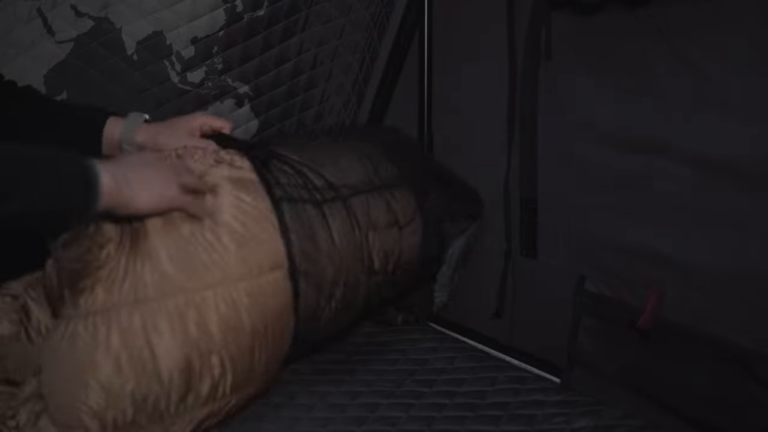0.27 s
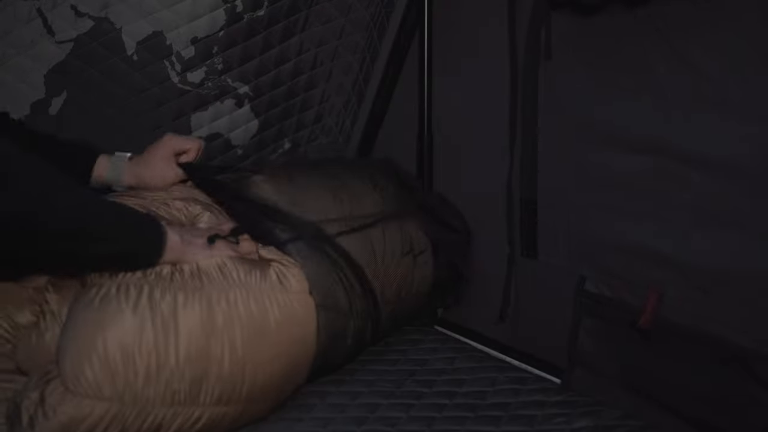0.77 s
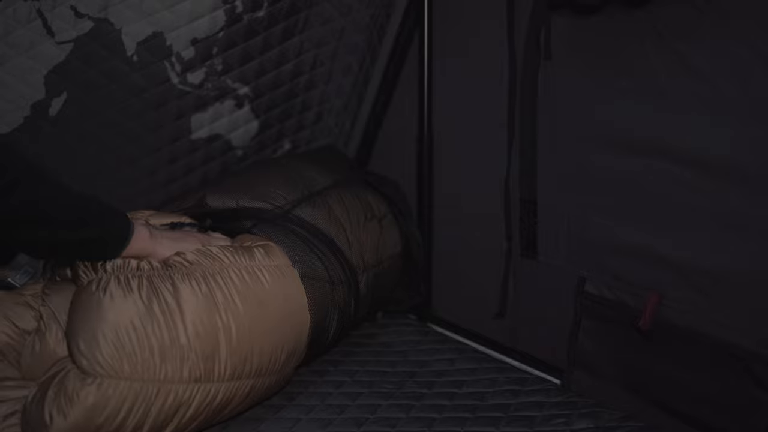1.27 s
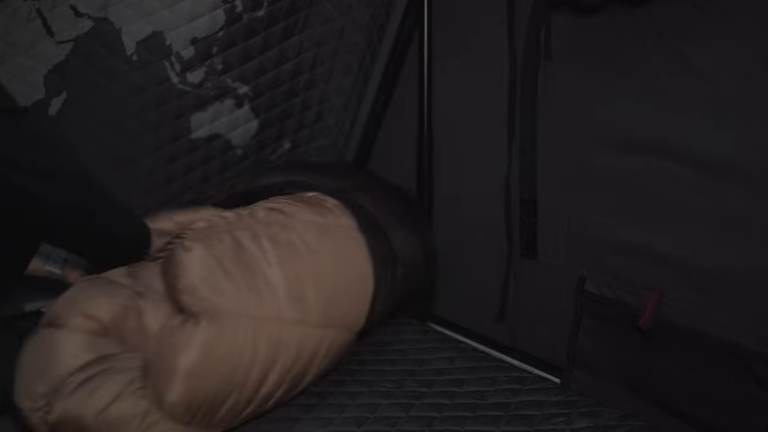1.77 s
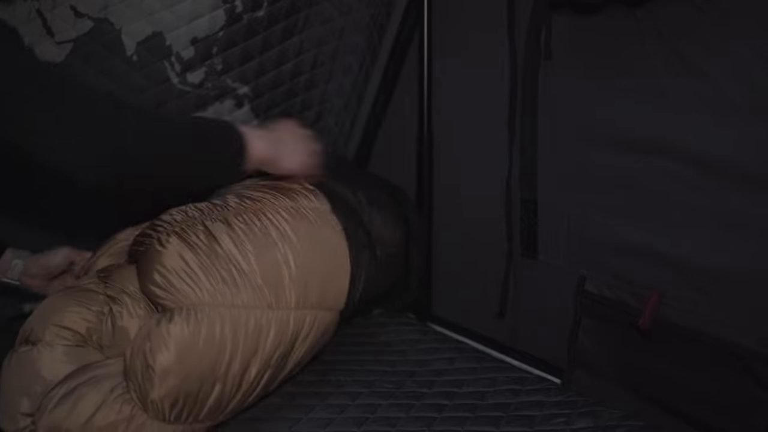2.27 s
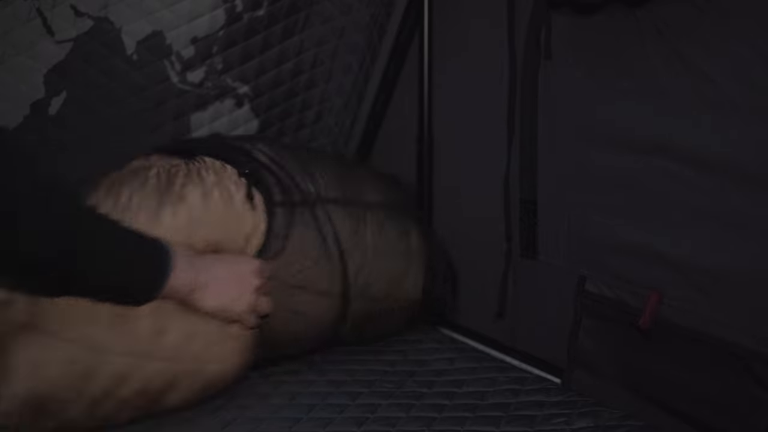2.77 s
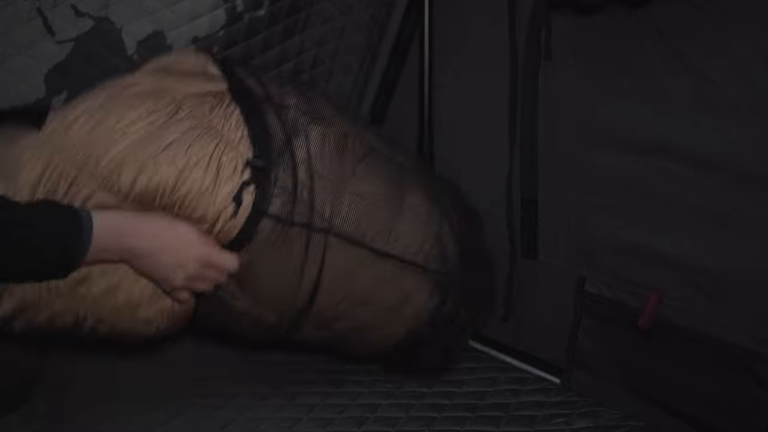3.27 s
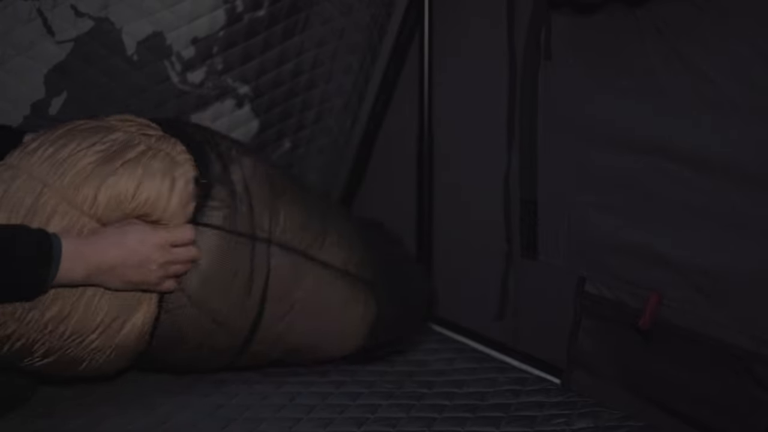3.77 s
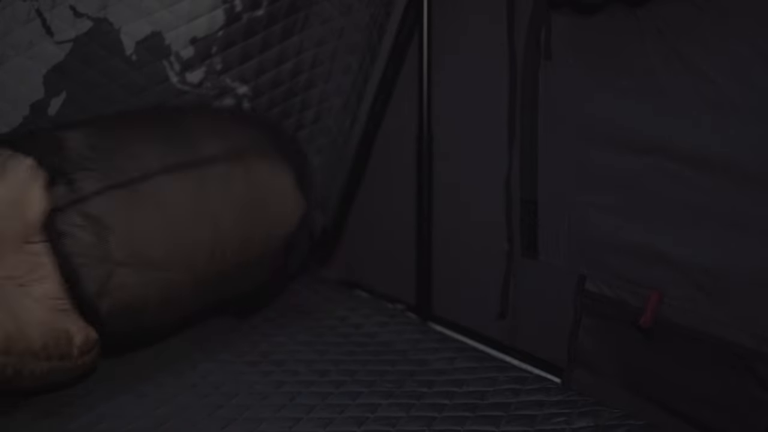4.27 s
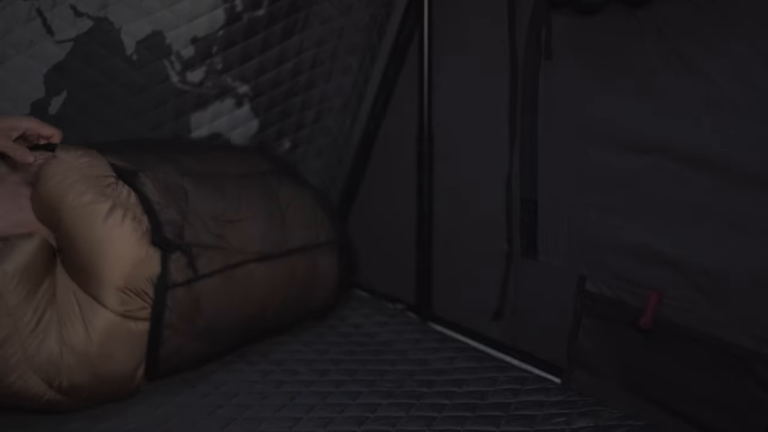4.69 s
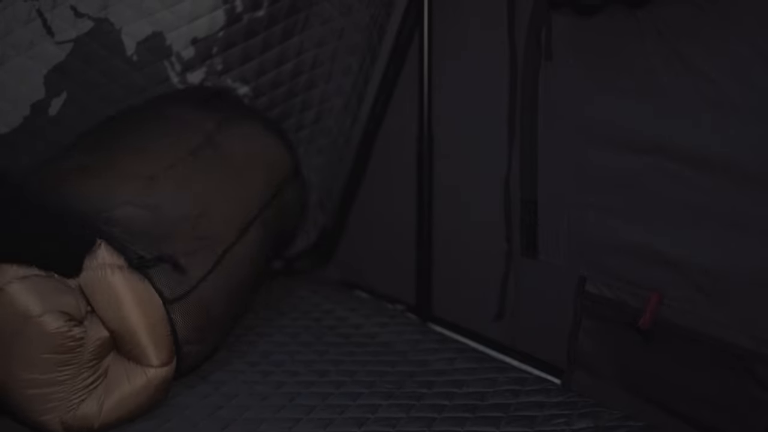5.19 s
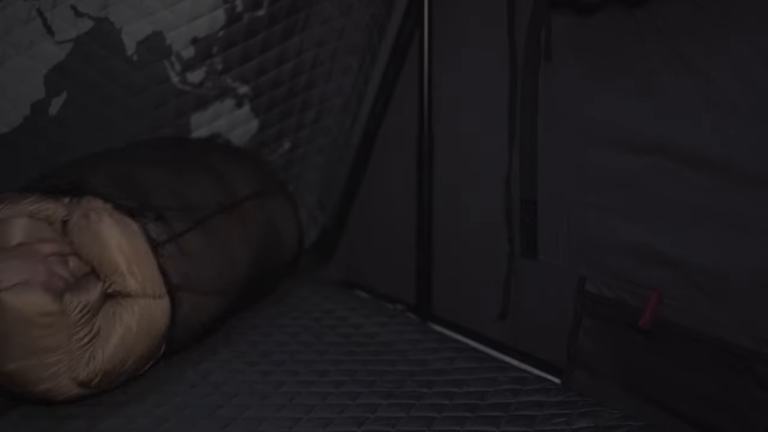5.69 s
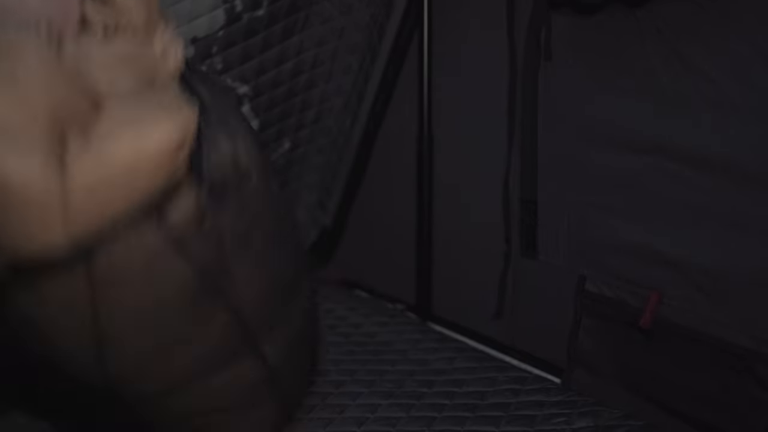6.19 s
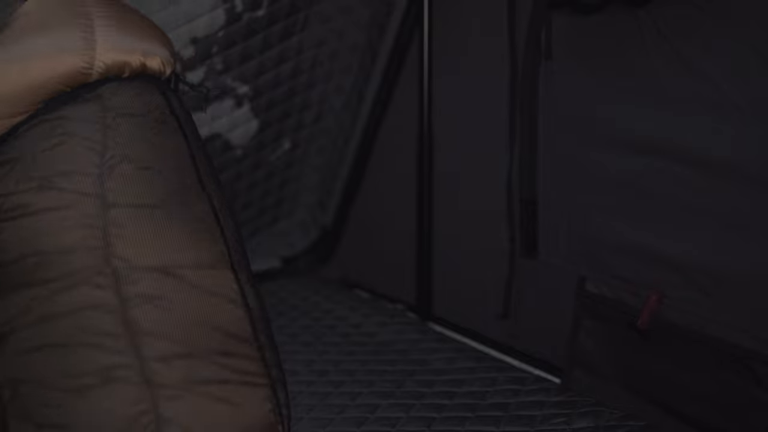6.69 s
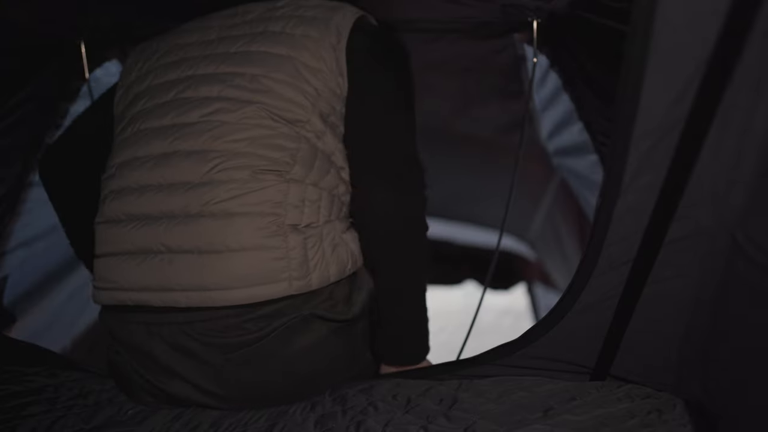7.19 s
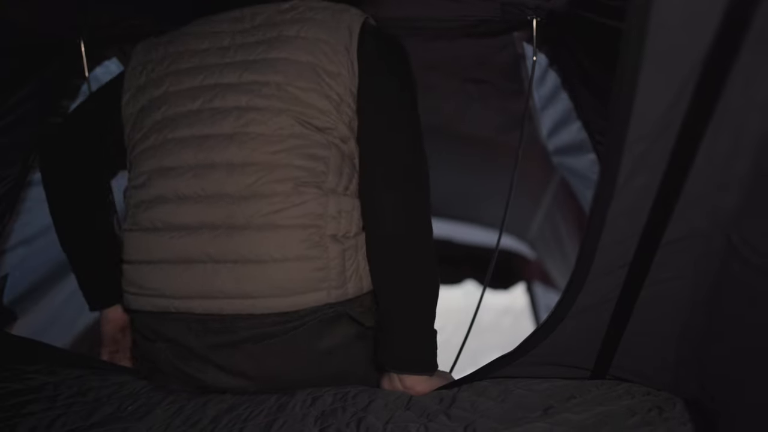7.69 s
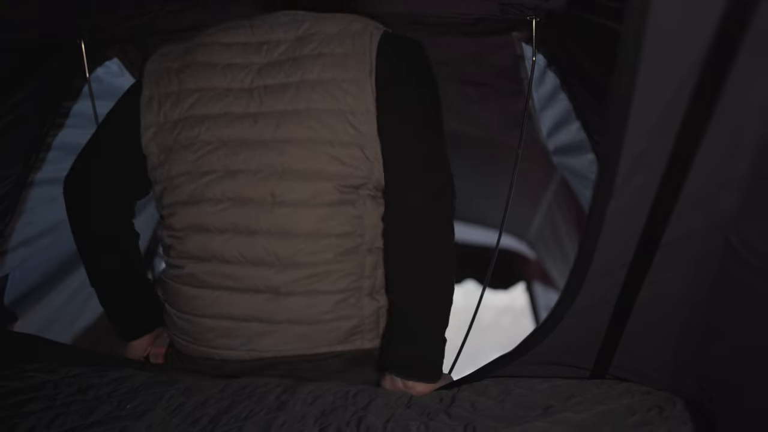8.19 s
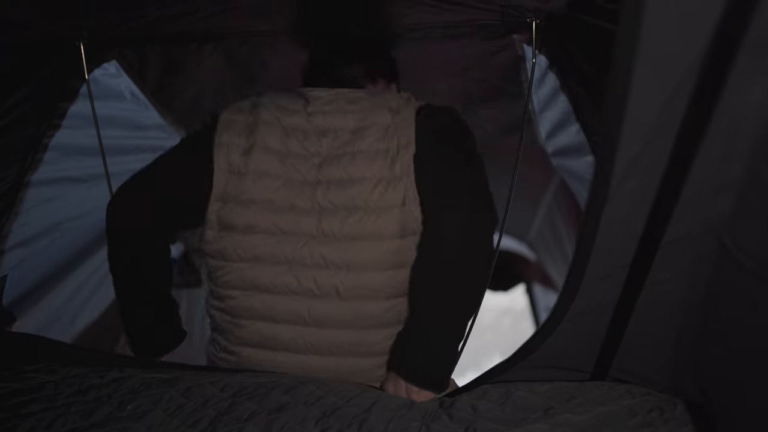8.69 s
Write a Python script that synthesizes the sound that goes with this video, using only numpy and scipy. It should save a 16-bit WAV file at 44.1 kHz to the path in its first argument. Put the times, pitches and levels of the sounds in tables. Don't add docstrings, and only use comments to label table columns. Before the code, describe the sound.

Bright, slippery cloth strokes come and go close to one microphone, over low draught rumble. Sharp snaps, soft thumps and a quick rattle over mat ribs punctuate the stuffing; a short whistling slide precedes the heaviest thump and pops. The sound then abruptly drops to distant, duller rustling and a few light knocks as someone moves out of the tent. Very little echo, almost identical in both channels.

```python
import sys
import numpy as np
from scipy import signal
from scipy.fft import rfft, irfft
from scipy.io import wavfile
from scipy.ndimage import uniform_filter1d

SR = 44100
rng = np.random.default_rng(int(sys.argv[2]) if len(sys.argv) > 2 else 0)


def file_out(sig):
    cols = np.atleast_2d(sig).T
    lim = np.clip(cols, -1, 1)
    pcm = np.round(lim * 32767).astype(np.int16)
    wavfile.write(sys.argv[1], SR, pcm)


def nominal_scale(level):
    x = np.asarray(level, float) / 20
    return 10 ** x


N = 394254
TIME = np.arange(N) / SR
CUT_S, LIFT_S = 7.165, 5.8

# t/s, level/dB
AIR_LEVEL = [(0.0, -25.5), (0.26, -33.5), (0.71, -48), (2.22, -46), (2.85, -56), (3.41, -43), (3.7, -45),
             (6.69, -55.5), (6.86, -33), (7.07, -40), (7.22, -41), (7.62, -39), (7.87, -47), (8.06, -37),
             (8.33, -46), (8.59, -37.5), (8.94, -40)]
# f/Hz, level/dB per Hz
DRAUGHT_TONE = [(5, -39), (12, 25), (25, 1), (45, 9), (90, -60)]
# f/Hz, level/dB per Hz
DRAG_TONE = [(200, -65), (450, 2.5), (650, 3), (1100, 2), (1700, -4), (2600, -6.5), (5000, -29)]
# f/Hz, level/dB per Hz
HEAVE_TONE = [(30, -31), (60, -2), (110, -1.5), (220, -4), (400, -8), (700, -35)]
# f/Hz, width/Hz, level/dB
RIB_CELLS = [(846, 117, 9), (1680, 130, 5.5), (2620, 170, 1), (3500, 550, -8)]
# f/Hz, level/dB per Hz
NEAR_TONE = [(530, -39), (900, -8.5), (1680, -3.5), (2890, -1), (3260, -1.5), (4460, -2.5), (8300, -2),
             (10300, -9.5), (12900, -10), (15200, -12.5), (16000, -46)]
# f/Hz, level/dB per Hz
FAR_TONE = [(260, -4), (450, -9), (1140, -7.5), (2790, -13.5), (4050, -11), (6530, -14.5), (9000, -13.5),
            (10600, -25), (14300, -21), (16000, -43)]

# peak t/s, swish level/dB, rise/s, fall/s, weight on the mat level/dB.
# Rise and fall each span 20 dB. First the bag is pushed into the sack lying on the ribs:
STUFFING_STROKES = [(0.112, -34.5, 0.68, 0.2, -51), (0.273, -32, 0.093, 0.035, -45),
                    (0.371, -32, 0.066, 0.13, -42), (0.672, -18.5, 0.24, 0.11, -40.5),
                    (0.813, -35, 0.086, 0.13, -39.5), (0.95, -35.5, 0.17, 0.15, -49),
                    (1.085, -28, 0.15, 0.12, -40.5), (1.18, -35.5, 0.16, 0.12, -40.5),
                    (1.45, -46, 0.66, 0.1, -68), (1.613, -34.5, 0.2, 0.089, -48),
                    (1.986, -31.5, 0.57, 0.079, -41), (2.178, -39.5, 0.025, 0.03, -53),
                    (2.247, -42, 0.74, 0.07, -52), (2.306, -40.5, 0.012, 0.03, -57),
                    (2.335, -44, 0.053, 0.048, -49), (2.407, -40, 0.014, 0.04, -56),
                    (2.436, -39.5, 0.05, 0.072, -49), (2.561, -38, 0.064, 0.13, -45.5),
                    (2.759, -29, 0.18, 0.27, -40), (2.96, -39.5, 0.24, 0.31, -53.5),
                    (3.184, -41, 0.13, 0.5, -48), (3.635, -35, 0.16, 0.036, -44),
                    (3.749, -35, 0.059, 0.071, -32), (3.883, -25.5, 0.053, 0.047, -36.5),
                    (4.041, -22, 0.31, 0.16, -41), (4.146, -26, 0.17, 0.053, -37.5),
                    (4.301, -31, 0.21, 0.044, -43), (4.544, -29.5, 0.3, 0.15, -43.5),
                    (4.72, -36.5, 0.15, 0.35, -43), (4.991, -19, 0.24, 0.19, -44.5),
                    (5.229, -27, 0.53, 0.095, -38.5)]
UPENDING_STROKES = [(5.414, -35.5, 0.14, 0.15, -46), (5.47, -43, 0.06, 0.06, -64),
                    (5.552, -35.5, 0.12, 0.19, -58), (5.704, -39.5, 0.034, 0.48, -46),
                    (5.932, -37.5, 0.44, 0.19, -45.5), (6.263, -34.5, 0.53, 0.17, -54),
                    (6.374, -34, 0.04, 0.115, -42), (6.478, -32.0, 0.067, 0.14, -50),
                    (6.729, -32, 0.43, 0.17, -39.5), (6.835, -25.5, 0.077, 0.0096, -39),
                    (6.891, -25.5, 0.027, 0.077, -38), (6.97, -31, 0.042, 0.16, -42),
                    (7.07, -29.5, 0.28, 0.1, -37.5)]
LEAVING_STROKES = [
    (7.218, -46.5, 0.11, 0.34, -47.5),
    (7.445, -45, 0.22, 1, -47.5),
    (7.876, -42.5, 0.3, 0.83, -49),
    (8.15, -51, 0.48, 1.5, -52),
    (8.324, -46, 0.012, 0.034, -48),
    (8.464, -44, 0.34, 0.13, -50.5),
    (8.645, -52, 0.551, 0.2, -56),
    (8.75, -66, 0.11, 0.1, -48.5),
    (8.88, -49, 0.096, 0.225, -69),
]

# peak t/s, level/dB, f/Hz
DEAD_THUDS = [(0.771, -37, 139), (1.947, -22, 302), (2.095, -31.5, 108), (2.18, -29, 103),
              (2.306, -31.5, 110), (2.741, -17.5, 119), (3.744, -19, 107), (3.759, -23, 126),
              (3.866, -21.5, 122), (3.913, -21.5, 163), (5.816, -24.5, 155), (5.87, -28.5, 150),
              (5.937, -37, 145), (6.42, -33, 154), (6.488, -32, 139), (6.537, -27.5, 133),
              (6.682, -31, 71.9), (6.727, -26, 172), (6.839, -10, 262), (6.855, -3, 98.3),
              (7.018, -14.5, 164), (7.994, -39, 226), (8.083, -30.5, 194), (8.188, -33, 219),
              (8.491, -30.5, 90.5), (8.53, -35, 81), (8.749, -37, 90)]
# peak t/s, level/dB, f/Hz
RINGING_SLUMPS = [(0.188, -22.5, 151), (0.836, -25, 270), (1.096, -37, 187), (3.223, -31, 200),
                  (3.261, -30, 220), (3.295, -30.5, 130), (3.777, -16.5, 123), (3.84, -22, 149),
                  (4.296, -26, 122.5), (4.441, -31.5, 130), (6.091, -36.5, 130), (6.255, -37, 121),
                  (5.405, -31.5, 125), (6.372, -37, 172), (6.885, -21.5, 128), (7.042, -17, 149),
                  (7.17, -31.5, 180), (7.619, -24, 213), (8.328, -32.5, 212), (8.473, -26, 246)]
# t/s, level/dB, f/Hz
HARD_KNOCKS = [(0.187, -29, 400), (0.794, -31, 950), (1.949, -22, 504), (1.957, -27, 350),
               (2.781, -29, 855), (3.258, -28.5, 760), (3.283, -33, 795), (3.91, -18.5, 760),
               (6.364, -39, 600), (6.54, -34, 695), (6.724, -19.5, 1140), (6.834, -18, 645),
               (7.021, -21, 610), (7.0315, -18, 865), (7.038, -22, 800), (7.276, -34.5, 850),
               (7.993, -38, 850), (8.183, -36.5, 829)]
# t/s, level/dB, f/Hz
PADDED_KNOCKS = [(2.432, -40.5, 1020), (2.736, -29, 990), (5.223, -31, 955), (5.813, -32, 1130),
                 (6.492, -34, 810), (6.841, -16.5, 760), (6.844, -17, 1030), (7.017, -26, 745),
                 (7.045, -20, 710), (7.049, -14.5, 996), (7.619, -31, 940), (8.47, -36, 610)]
# t/s, knock level/dB, cloth scratch level/dB
RIB_YANK = [(3.695, -40, -42), (3.706, -37, -24.5), (3.721, -33, -43.5), (3.73, -27, -27),
            (3.742, -28, -20), (3.749, -40, -29), (3.758, -31, -32), (3.771, -28, -24), (3.782, -26, -26),
            (3.794, -31, -35), (3.807, -38, -45), (3.857, -30, -39)]
# t/s, level/dB, f/Hz
CLOTH_SNAPS = [(1.597, -40, 4554), (1.9465, -21, 2400), (2.178, -44, 3500), (3.257, -30, 3250),
               (3.281, -29, 3040), (7.993, -43, 1500), (8.183, -48, 1500), (5.872, -27, 2500),
               (6.72, -29, 1960), (6.837, -17.5, 3080), (7.62, -33, 1900), (8.3255, -31.5, 4200)]
# t/s, level/dB, f/Hz
CLOTH_SCUFFS = [
    (2.305, -46, 2670),
    (2.354, -41, 1470),
    (2.428, -38, 2900),
]
PULL_TIMES = [8.352, 8.376]
PULL_LEVELS = [-45, -49]
# f/Hz, level/dB, time to fall 60 dB/s
PULL_TONES = [(12210, -5, .06), (13300, 0, .035), (14640, 1, .13)]

# start t/s, level/dB, f/Hz, turns until it has died to a third
SUDDEN_POPS = [(0.183, -21.5, 300, 1.1), (0.1923, -24.5, 338, 1), (1.9438, -14, 230, 0.93),
               (1.944, -2.5, 794, 1.1), (1.9455, -14, 1500, 1.2), (1.948, -18, 415, 1),
               (1.9522, -22, 487, 1.1), (2.209, -28, 171, 0.75), (2.404, -37, 1750, 4),
               (2.427, -34, 900, 3.6), (2.72, -26, 200, 1.7), (2.732, -28, 1530, 8.6), (3.717, -26, 110, 2.2),
               (3.7402, -11, 2600, .9), (3.7445, -26, 1810, 13), (3.752, -22, 704, 1.7),
               (3.769, -26, 94.5, 1.8), (3.794, -32, 382, 2.6), (3.802, -28, 100, 3.4), (3.816, -32, 870, 4),
               (3.875, -20, 2400, 1.5), (3.878, -34, 1000, 4), (4.4, -43, 310, 8), (5.803, -24, 149, 1.4),
               (6.108, -34, 950, 2), (6.235, -32, 730, 5.5), (6.3607, -20.5, 165, 0.67),
               (6.4875, -20, 600, .6), (6.496, -25, 700, .8), (6.535, -23, 450, .6), (6.8375, -2, 560, 0.75),
               (6.8399, -3.5, 754, 1), (6.8393, -10, 1510, 3.4), (6.844, -11, 189, 1.4),
               (6.8506, -5, 330, 0.69), (7.0432, -8, 600, 0.88), (7.61, -26, 800, 2.4), (7.626, -24, 168, 2),
               (7.644, -33, 420, 2.8), (7.992, -23, 560, 0.57), (8.1837, -19.5, 360, 0.71),
               (8.3242, -18, 2200, .6), (8.467, -29, 323, 4), (8.527, -25, 7000, 1.5),
               (0.773, -28.5, 180, 0.91), (0.869, -34, 150, 1.8), (1.087, -30, 870, 5),
                (1.955, -26, 1500, 3), (2.316, -40, 12500, 60), (2.402, -41, 8400, 90),
                (2.441, -30, 3600, 13), (2.7, -24.5, 1200, 2), (2.724, -25, 900, 4), (3.209, -33, 250, 1.2),
                (3.23, -31, 200, 1), (3.281, -26, 280, 1.3), (3.749, -27, 2800, 6), (2.354, -34, 250, 1.5),
                (3.7699, -20.5, 300, 1), (3.81, -29, 250, 2), (3.858, -21, 330, 1.7),
                (6.587, -33, 300, 1.5), (6.658, -30, 200, 1.3), (6.701, -27, 150, 1.6),
                (3.716, -30, 900, 3), (3.7575, -18.5, 160, 1), (3.758, -31, 1100, 2),
                (6.4154, -22, 300, 0.65), (6.422, -30, 150, 1), (6.691, -31, 450, 2.1),
                (6.7187, -11, 480, 0.66), (6.8318, -16, 330, 1.3), (7.013, -27, 400, 1.3),
                (7.0445, -6.5, 740, 1), (7.0487, -19, 1100, 3), (7.053, -10.5, 1010, 3),
                (7.0575, -18, 900, 1.7), (7.657, -31, 700, 2), (7.662, -35, 1500, 3), (7.72, -31, 200, 1.6),
                (7.773, -28, 310, 2), (8.13, -29, 400, 1), (8.25, -30, 900, 2), (7.793, -28, 500, 0.92),
                (7.978, -36, 700, 4), (8.3238, -25, 7500, 1.8), (8.3242, -34, 200, 0.85),
                (8.434, -31, 900, 3), (8.66, -35, 242, 2), (8.745, -31, 552, 2)]
# start t/s, end t/s, level/dB, first f/Hz, last f/Hz
SEAM_SCRAPES = [
    (6.374, 6.387, -32, 2850, 2450),
    (6.396, 6.419, -24, 1937, 795),
    (6.832, 6.842, -28, 6200, 2600),
]
# start t/s, end t/s, slips per s, level/dB, pitch factor
RIB_JUDDERS = [
    (4.153, 4.348, 72, -46, 0.98),
    (4.363, 4.631, 54, -43.5, 0.99),
    (6.149, 6.279, 98, -47.5, 0.82),
]
# (frequency ratio, level/dB)
FUZZY_BANDS = [
    (1100, [(0, 1870, -44), (.06, 3000, -44), (.11, 4100, -37), (.16, 4800, -44), (.22, 5400, -43)]),
    (1150, [(6.07, 4600, -55), (6.125, 6030, -42), (6.16, 7240, -39), (6.23, 8100, -32), (6.295, 8000, -36), (6.33, 6340, -43), (6.39, 3500, -47)], [(1.58, -2)]),
    (450, [(6.09, 4000, -48), (6.12, 4100, -43), (6.25, 3913, -45), (6.32, 4170, -53)]),
    (420, [(6.37, 3000, -48), (6.388, 2310, -49), (6.399, 1920, -30), (6.412, 990, -35), (6.422, 300, -32)]),
    (460, [(4.5, 2300, -57), (4.585, 2620, -35.5), (4.62, 2700, -42)]),
    (2500, [(2.31, 12600, -50), (2.318, 12600, -43), (2.34, 13300, -41), (2.352, 12500, -49)]),
    (6000, [(8.85, 12000, -62), (8.865, 12000, -55), (8.9, 12000, -53), (8.93, 12000, -60)]),
    (76, [(2.77, 250, -34), (2.825, 210, -36), (2.87, 170, -42)]),
]
# t/s, low f/Hz, high f/Hz
SIDE_SPLITS = [(0.811, 4600, 7700), (0.882, 8900, 10400), (1.786, 13700, 15300), (1.972, 8200, 9800),
               (1.974, 11600, 13200), (2.902, 10200, 12500), (4.039, 8800, 10400), (4.135, 4200, 5800),
               (4.135, 6800, 9700), (4.135, 13800, 15200), (4.875, 5600, 7000), (4.875, 11100, 13900),
               (5.201, 5600, 8300), (5.409, 8800, 10500), (5.502, 13000, 14600), (5.735, 10300, 11800),
               (5.737, 12300, 14600), (6.594, 4100, 5200), (7.59, 5000, 6400), (7.591, 11600, 13100),
               (7.822, 4200, 5300)]


def evened(x):
    return x / np.sqrt(np.mean(x ** 2) + 1e-20)


def read(points, hz):
    f, value = np.transpose(points)
    return np.interp(np.log(hz + 1), np.log(f + 1), value)


def column(table, t, index):
    rows = np.array(table)
    return np.interp(t, rows[:, 0], rows[:, index])


def add(mix, s, sound):
    part = mix[max(round(s * SR), 0):][:len(sound)]
    part += sound[:len(part)]


def coloured(x, points):
    gain = nominal_scale(read(points, np.fft.rfftfreq(len(x), 1 / SR)))
    return evened(irfft(rfft(x) * gain, len(x)))


def hiss(count):
    return rng.standard_normal(SR // 2)[:count]


def wander(hz):
    pole = np.exp(-2 * np.pi * hz / SR)
    return evened(signal.lfilter([1], np.convolve([1, -pole], [1, -pole]), rng.standard_normal(N)))


def uneven_noise(hz):
    return nominal_scale(2.0 * wander(hz)) * rng.standard_normal(N)


def resonate(x, hz, width):
    turn = np.exp(2j * np.pi * np.cumsum(hz * np.ones(len(x))) / SR)
    r = np.exp(-np.pi * width / SR)
    return 2 * (turn * signal.lfilter([1 - r], [1, -r], x / turn + 1e-18)).real


def slips(per_s, spread_db):
    chance, size, sign = rng.random((3, N))
    loudness = nominal_scale(-spread_db * np.log(size + 0.0064))
    return (chance < per_s / SR) * loudness * np.sign(sign - .5)


def humps(t, peak_s, peak_db, rise, fall, rest_db, depth=1):
    coarse = np.arange(0, N / SR + .002, .002)[:, None]
    apart = abs(coarse - peak_s) / np.where(coarse < peak_s, rise, fall)
    swell_db = peak_db - 20 * depth * apart ** 1.47
    power = nominal_scale(2 * swell_db).sum(1) + nominal_scale(2 * rest_db)
    return np.interp(t, coarse[:, 0], 10 * np.log10(power))


def strokes(t):
    rows = STUFFING_STROKES + UPENDING_STROKES + LEAVING_STROKES
    s, swish_db, rise, fall, weight_db = np.transpose(rows)
    swish_level = humps(t, s, swish_db, rise, fall, rest_db=-70)
    weight_level = humps(t, s, weight_db, rise, fall, rest_db=-60.5, depth=0.67)
    return swish_level, weight_level


def draught():
    return nominal_scale(column(AIR_LEVEL, TIME, index=1)) * coloured(rng.standard_normal(N), DRAUGHT_TONE)


def tent(x):
    t = TIME[:SR // 10]
    echoes = rng.standard_normal(len(t)) * (rng.random(len(t)) < .06)
    fade = nominal_scale(-60 * t / 0.031) * (t > .003)
    tail = signal.lfilter([1], [1, -.6], echoes) * fade
    return signal.oaconvolve(x, tail / np.linalg.norm(tail))[:N]


def floor_dip(x):
    return x - 0.45 * (TIME < LIFT_S) * resonate(x, hz=479, width=200)


def heaving(weight_db):
    s, db, _ = np.transpose(DEAD_THUDS + RINGING_SLUMPS)
    wake_s = 0.084
    wake_db = humps(TIME, s, -45 + 0.53 * (db + 24.5), wake_s, 1.8 * wake_s, rest_db=-66)
    lean_db = -46 + 0.65 * (weight_db + 46.5) + np.where(TIME < CUT_S, -1.5, 1.5)
    return np.hypot(nominal_scale(wake_db), nominal_scale(lean_db))


def mat():
    bumps = slips(per_s=220, spread_db=0.5)
    cells = evened(sum(nominal_scale(db) * resonate(bumps, hz, width) / width for hz, width, db in RIB_CELLS))
    crumple = coloured(slips(per_s=300, spread_db=1.5), DRAG_TONE)
    rubbing = coloured(uneven_noise(hz=40.0), DRAG_TONE)
    drag = np.where(TIME < LIFT_S, .5 * cells, 0.58 * crumple) + 1.17 * rubbing
    heave = coloured(uneven_noise(hz=10.0), HEAVE_TONE)
    weight_db = strokes(TIME)[1]
    return nominal_scale(weight_db) * drag + heaving(weight_db) * heave


def blow(s, db, hz, ms, rise, grit, partials, loose=0.071):
    length = ms / 1000
    t = np.arange(round(6 * length * SR)) / SR
    peak = rise * length
    shape = (t / peak * np.exp(1 - t / peak)) ** 1.43
    detune, turn = rng.standard_normal((2, len(partials), 1))
    ratio, part_db = np.transpose(partials)[:, :, None]
    part_hz = hz * ratio * (1 + loose * detune)
    ring = (nominal_scale(part_db) * np.cos(2 * np.pi * (part_hz * (t - peak) + 0.31 * turn))).sum(0)
    gritty = evened(resonate(hiss(len(t)), 1.08 * hz, 0.34 * hz))
    return s - peak, nominal_scale(db) * shape * (ring + grit * gritty)


def thumps(out):
    for rows, turns in (DEAD_THUDS, 2.1), (RINGING_SLUMPS, 3.6):
        for s, db, hz in rows:
            add(out, *blow(s, db, hz, turns / hz * 1e3, rise=0.29, grit=0.22,
                           partials=[(.62, -4), (.9, -1.5), (1.45, -7), (2.4, -15.5)]))


def knocks(out):
    for rows, ms in (HARD_KNOCKS, 5.4), (PADDED_KNOCKS, 7.5):
        for row in rows:
            add(out, *blow(*row, ms, rise=0.296, grit=0.17,
                           partials=[(.45, -11.5), (.7, -0.5), (1.1, 0.5), (1.6, -11.5), (2.2, -8)]))


def yank(out):
    for s, db, scratch_db in RIB_YANK:
        add(out, *blow(s, db, hz=900, ms=4.4, rise=0.43, grit=0.38,
                       partials=[(1.03, 7.5), (1.98, -5), (2.97, -4)], loose=0.032))
        add(out, *blow(s - .001, scratch_db, hz=4200, ms=2.2, rise=0.4, grit=0.81,
                       partials=[(.64, 0.5), (.9, -9), (1.3, -4)]))


def snaps_and_scuffs(out):
    for row in CLOTH_SNAPS:
        add(out, *blow(*row, ms=2.05, rise=0.25, grit=0.52,
                       partials=[(.65, 1.5), (.9, 0), (1.3, -7), (2.2, -16)]))
    for row in CLOTH_SCUFFS:
        add(out, *blow(*row, ms=7, rise=0.4, grit=1.5,
                       partials=[(.6, 3), (1.1, -3), (1.7, -5), (2.6, -9)]))


def zip_pull(out):
    t = TIME[:SR // 8]
    for s, strike_db in zip(PULL_TIMES, PULL_LEVELS):
        add(out, s, sum(nominal_scale(strike_db + db - 60 * t / t60) * np.sin(2 * np.pi * hz * t)
                        for hz, db, t60 in PULL_TONES))


def hits():
    out = np.zeros(N)
    for source in thumps, knocks, yank, snaps_and_scuffs, zip_pull:
        source(out)
    return signal.sosfiltfilt(signal.butter(3, 52, "high", fs=SR, output="sos"), out)


def judder(start, end, per_s, db, pitch):
    t = TIME[:round((end - start + .05) * SR)]
    uneven = evened(uniform_filter1d(hiss(len(t)), size=400))
    turns = np.cumsum(per_s * np.exp(.25 * uneven)) / SR
    scuff = np.exp(-(turns % 1) / 0.33) * hiss(len(t)) * nominal_scale(6.6 * uneven)
    swell = np.interp(t, [0, .03, end - start - .03, end - start], [0, 1, 1, 0])
    cells = sum(nominal_scale(cell_db) * resonate(scuff * swell, hz * pitch, width) / np.sqrt(width)
                for hz, width, cell_db in RIB_CELLS)
    return start, nominal_scale(db) * evened(resonate(cells, 800, 3000))


def seam_scrape(start, end, db, first_hz, last_hz):
    count = round((end - start) * SR)
    angle = 2 * np.pi * np.cumsum(np.linspace(first_hz, last_hz, count)) / SR
    return start, nominal_scale(db) * np.hanning(count) ** 0.33 * (np.sin(angle) + nominal_scale(-18) * np.sin(2 * angle))


def pop(s, db, hz, turns):
    cycles = hz * TIME[:round(8 * turns / hz * SR)]
    onset = 1 - np.exp(-cycles / 0.063)
    return s, -nominal_scale(db) * np.sin(2 * np.pi * cycles) * np.exp(-cycles / turns) * onset


def whistle(width, rows, overtones=()):
    t = np.arange(rows[0][0], rows[-1][0], 1 / SR)
    hz, db = column(rows, t, index=1), column(rows, t, index=2)
    flutter = evened(uniform_filter1d(hiss(len(t)), size=300))
    noise = hiss(len(t)) * nominal_scale(0.89 * flutter)
    bands = np.zeros(len(t))
    for ratio, over_db, blur in [(0.99, 0, 1)] + [(*band, 4) for band in overtones]:
        once = resonate(noise, ratio * hz, blur * width)
        bands += nominal_scale(over_db) * evened(resonate(once, ratio * hz, blur * width))
    return t[0], nominal_scale(db) * bands * signal.windows.tukey(len(t), .1)


def swish():
    threads = nominal_scale(0.58 * wander(hz=85)) * rng.standard_normal(N)
    drive = threads + 0.45 * evened(slips(per_s=2500, spread_db=2.0))
    hz, t, z = signal.stft(drive, SR, nperseg=512, noverlap=384)
    patches = uniform_filter1d(rng.standard_normal(z.shape), size=12, axis=0)
    patches = evened(uniform_filter1d(patches, size=20, axis=1))
    tone_db = np.where(t < CUT_S, read(NEAR_TONE, hz)[:, None], read(FAR_TONE, hz)[:, None])
    swish_db, weight_db = strokes(t)
    tilt = np.clip(0.21 + 0.14 * (swish_db - weight_db), -4, 6) * (t < CUT_S)
    octaves = np.log2(np.clip(hz, 1000, 12000) / 6000)[:, None]
    shape = nominal_scale(tone_db + tilt * octaves)
    shape /= np.sqrt(np.mean(shape ** 2 * (hz > 2500)[:, None], axis=0))
    cloth = signal.istft(z * shape * nominal_scale(1.38 * patches), SR, nperseg=512, noverlap=384)[1][:N]
    return nominal_scale(strokes(TIME)[0] - 1.0) * cloth


def scene():
    events, pops = hits(), np.zeros(N)
    for source, rows in (whistle, FUZZY_BANDS), (seam_scrape, SEAM_SCRAPES), (judder, RIB_JUDDERS):
        for row in rows:
            add(events, *source(*row))
    for row in SUDDEN_POPS:
        add(pops, *pop(*row))
    echo = nominal_scale(-18.0) * tent(events + pops)
    mono = pops + floor_dip(events + echo + swish() + mat() + draught())
    return np.tile(mono, (2, 1))


def parted(x):
    side, hz, window = np.zeros(N), np.fft.rfftfreq(2048, 1 / SR), np.hanning(2048) ** .5
    for s, low, high in SIDE_SPLITS:
        piece = x[0, round(s * SR) - 1024:][:2048] * window
        band = rfft(piece) * (hz > low) * (hz < high)
        scrambled = irfft(abs(band) * np.exp(2j * np.pi * rng.random(len(hz))))
        add(side, s - 1024 / SR, window * scrambled)
    return x + 0.9 * side * np.array([[1], [-1]])


def band_limit(x):
    return signal.sosfilt(signal.butter(12, 16760, fs=SR, output="sos"), x)


def record(dry):
    ceiling = .64
    held = dry / (1 + abs(dry / ceiling) ** 8) ** (1 / 8)
    low_pass = signal.firwin(801, 15740, window=("kaiser", 9), fs=SR)
    held = signal.oaconvolve(held, low_pass[None], "same")
    return band_limit(parted(held))


dry = scene()
out = record(dry)
file_out(out)
```